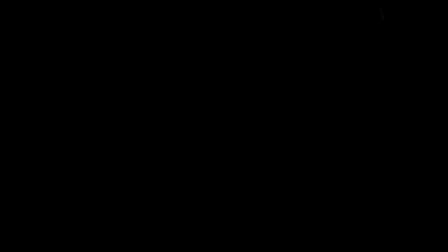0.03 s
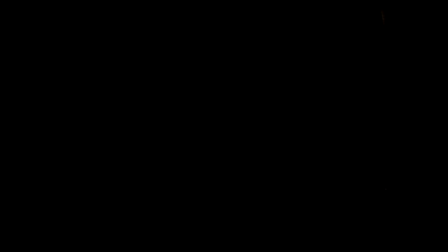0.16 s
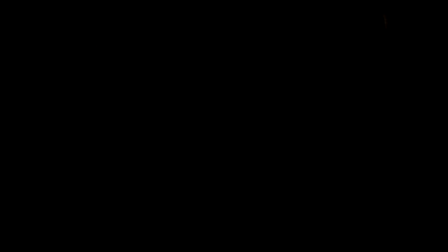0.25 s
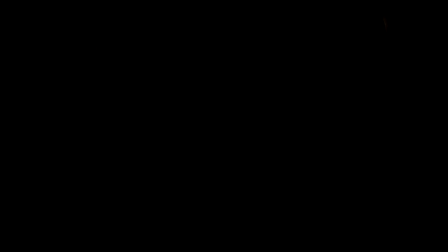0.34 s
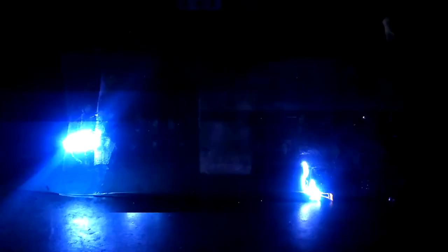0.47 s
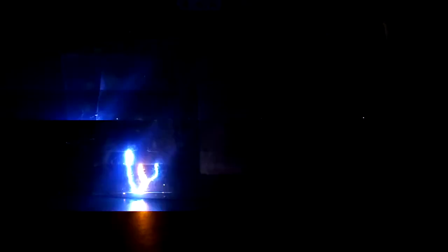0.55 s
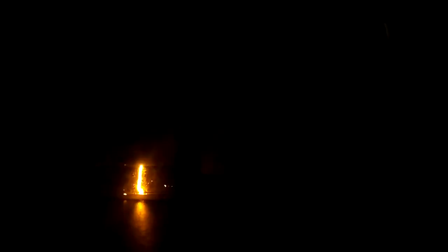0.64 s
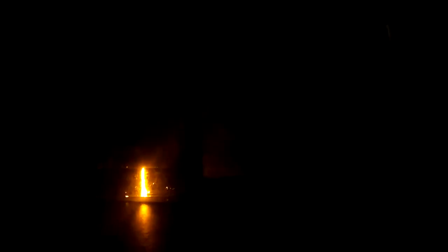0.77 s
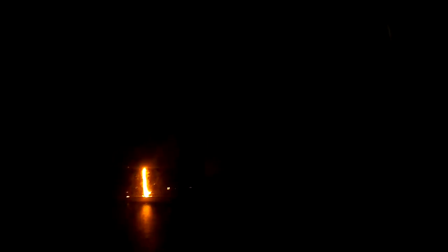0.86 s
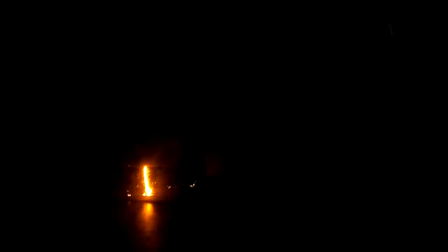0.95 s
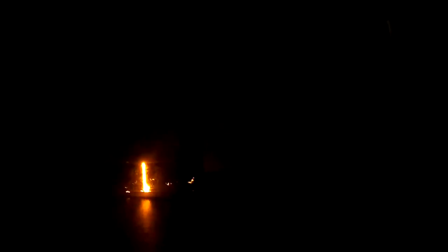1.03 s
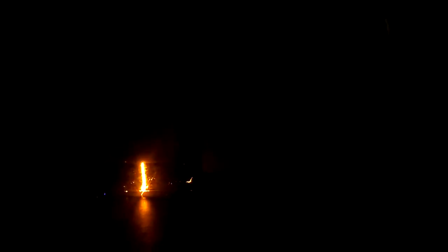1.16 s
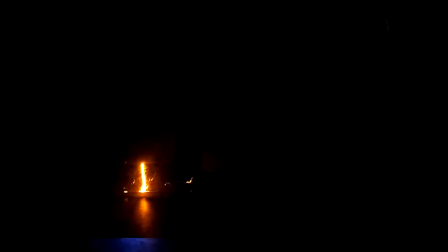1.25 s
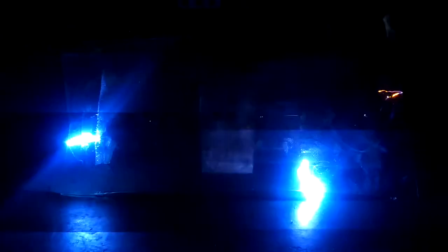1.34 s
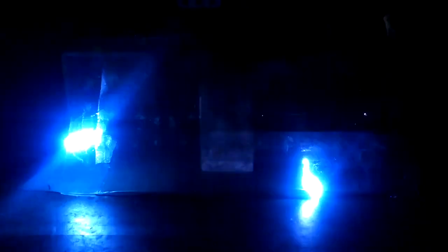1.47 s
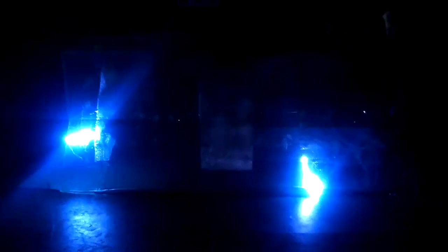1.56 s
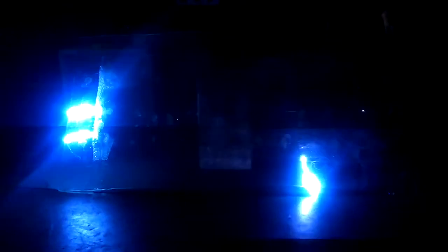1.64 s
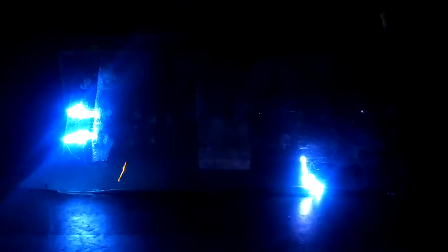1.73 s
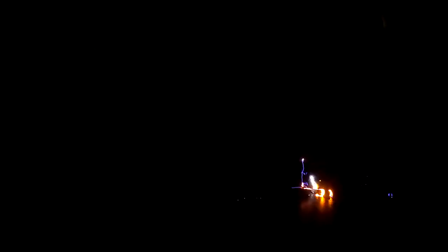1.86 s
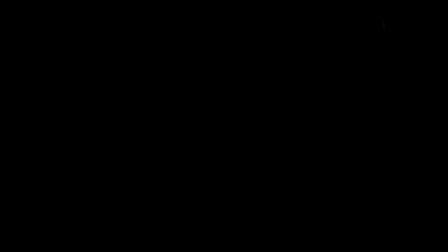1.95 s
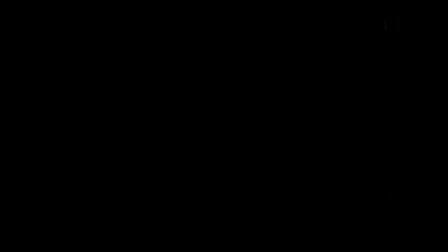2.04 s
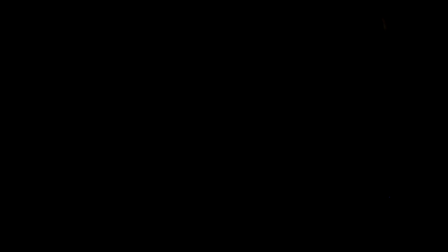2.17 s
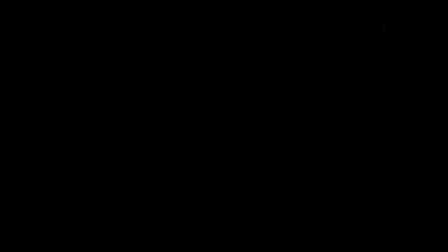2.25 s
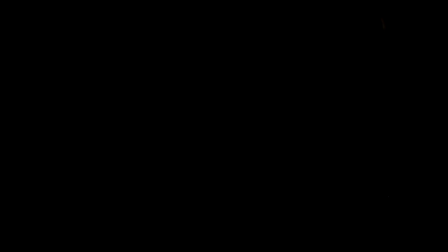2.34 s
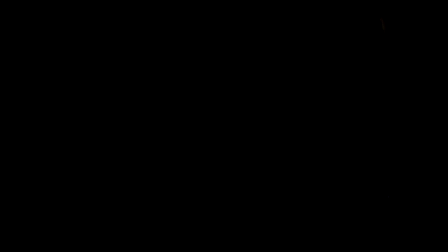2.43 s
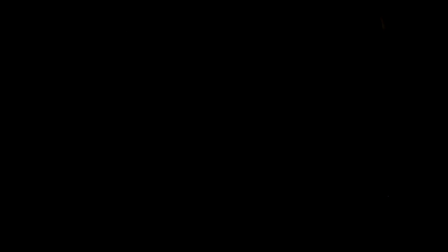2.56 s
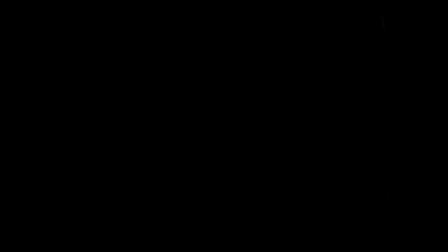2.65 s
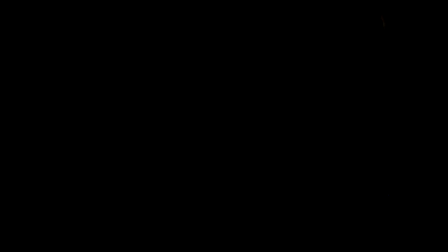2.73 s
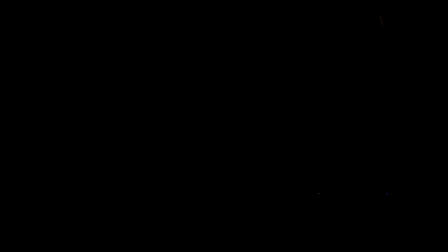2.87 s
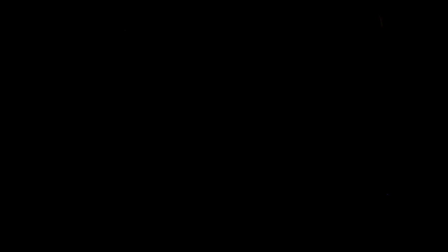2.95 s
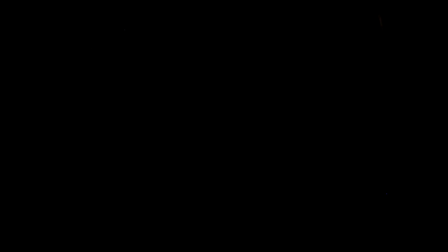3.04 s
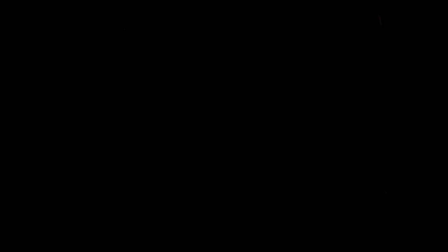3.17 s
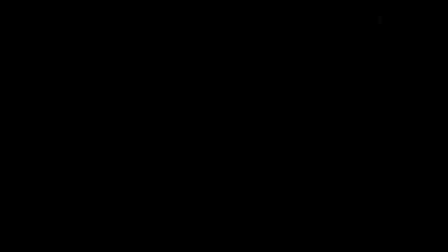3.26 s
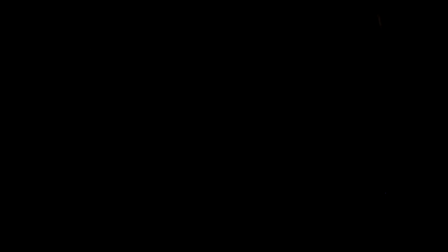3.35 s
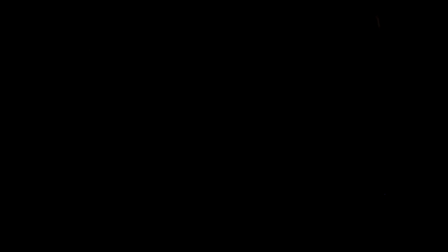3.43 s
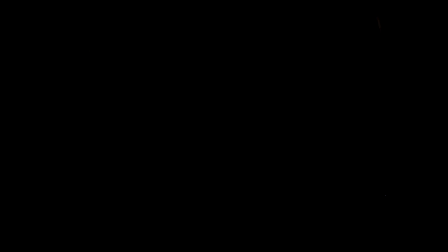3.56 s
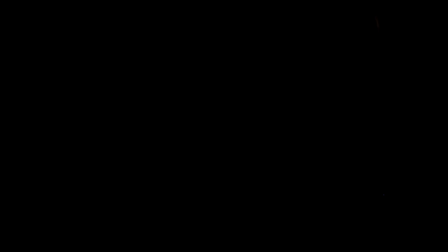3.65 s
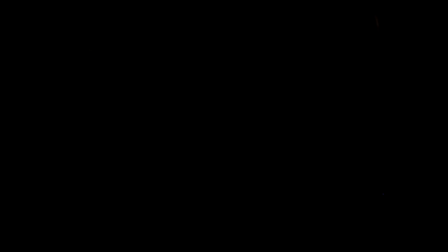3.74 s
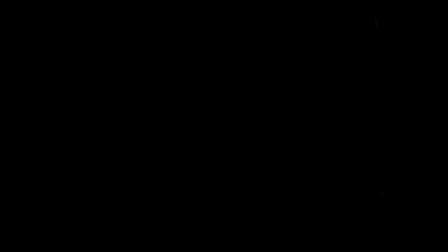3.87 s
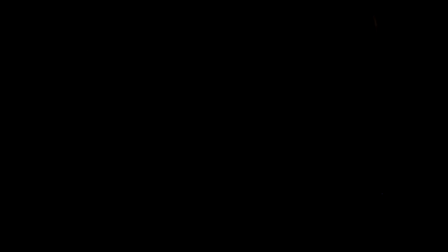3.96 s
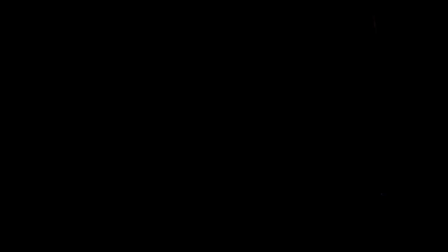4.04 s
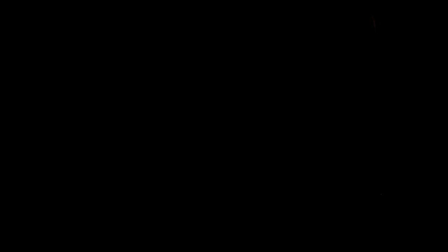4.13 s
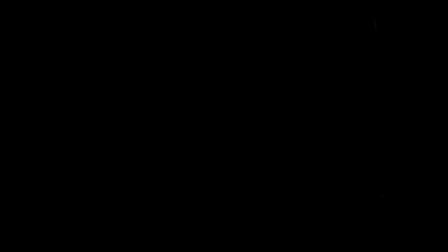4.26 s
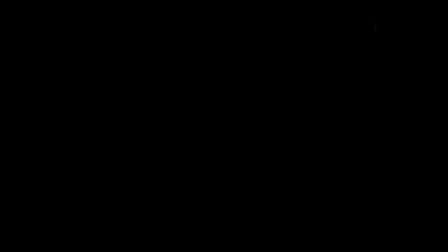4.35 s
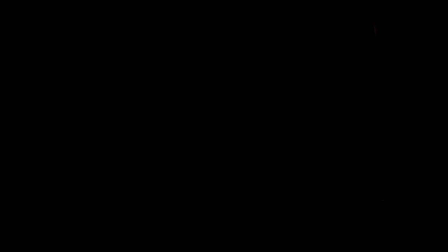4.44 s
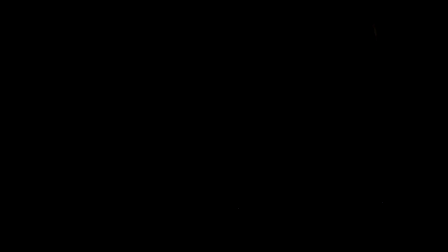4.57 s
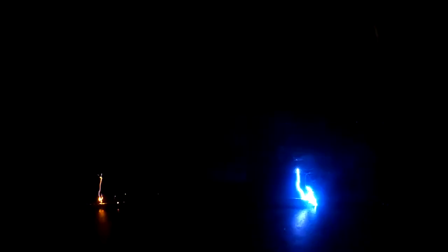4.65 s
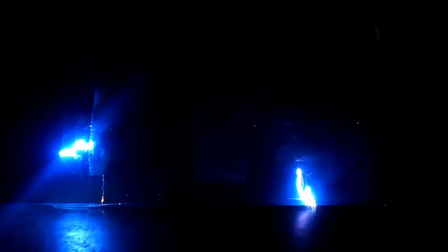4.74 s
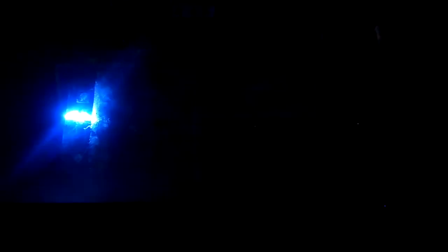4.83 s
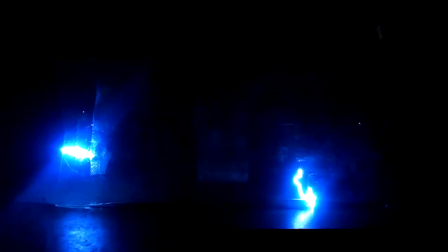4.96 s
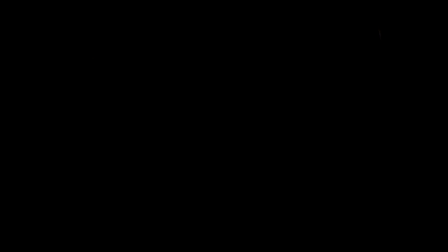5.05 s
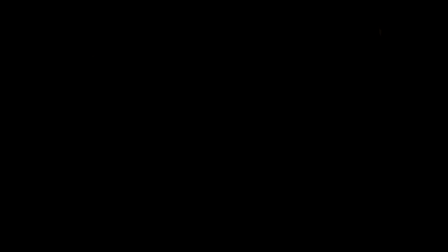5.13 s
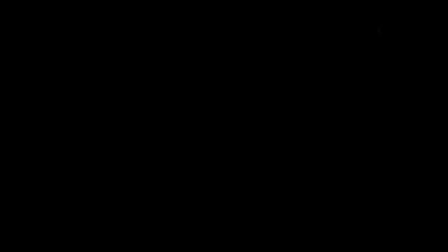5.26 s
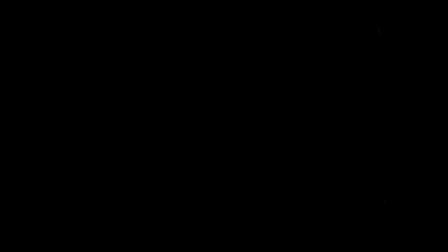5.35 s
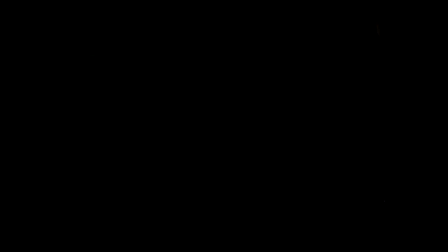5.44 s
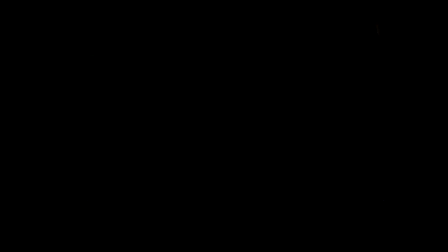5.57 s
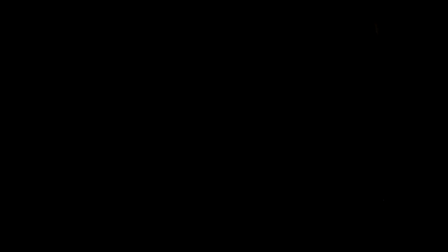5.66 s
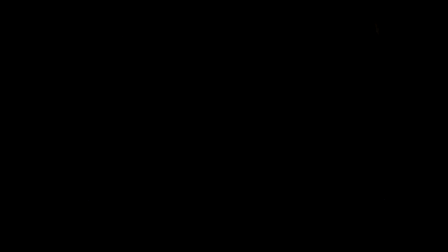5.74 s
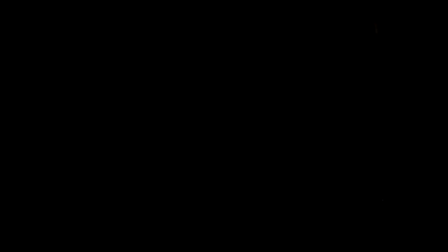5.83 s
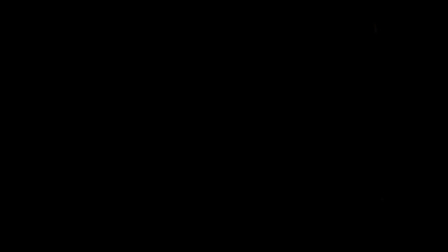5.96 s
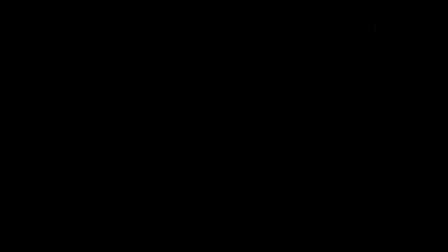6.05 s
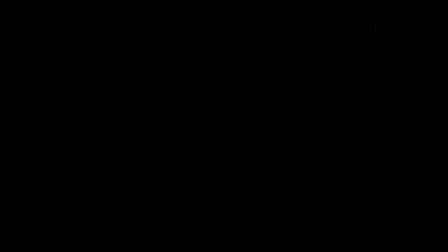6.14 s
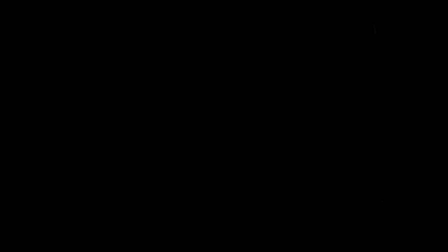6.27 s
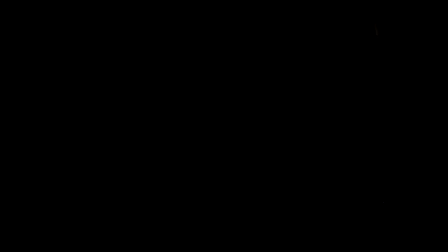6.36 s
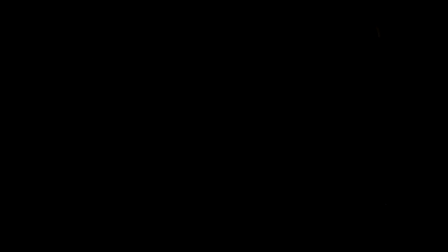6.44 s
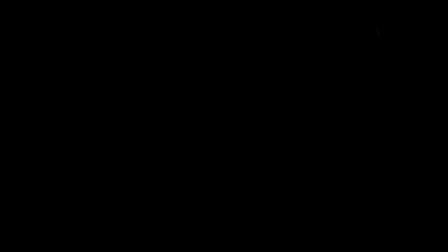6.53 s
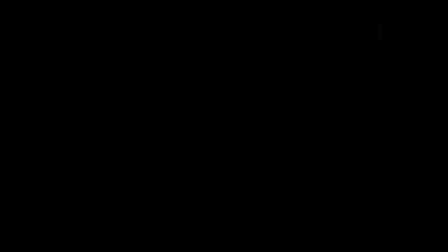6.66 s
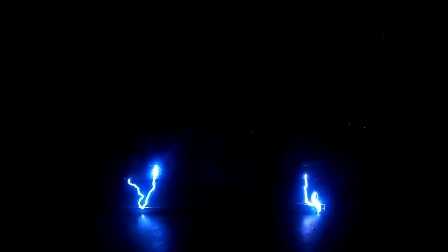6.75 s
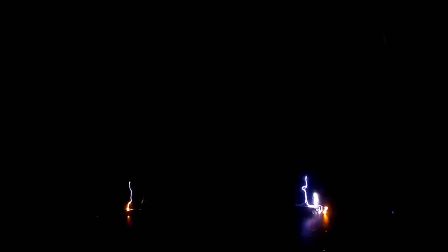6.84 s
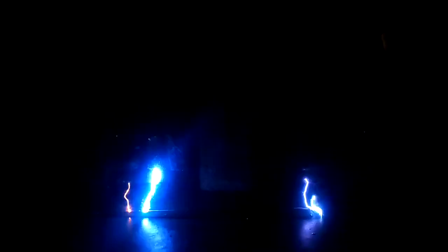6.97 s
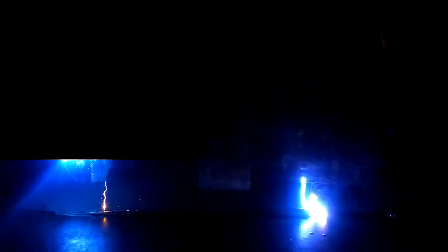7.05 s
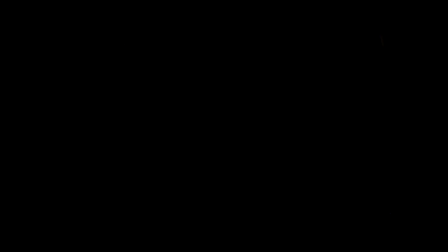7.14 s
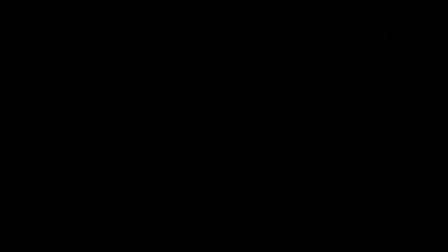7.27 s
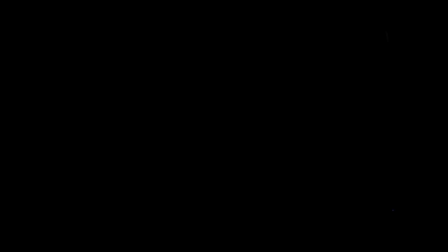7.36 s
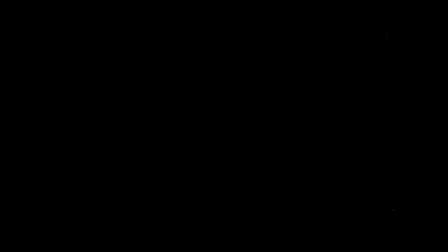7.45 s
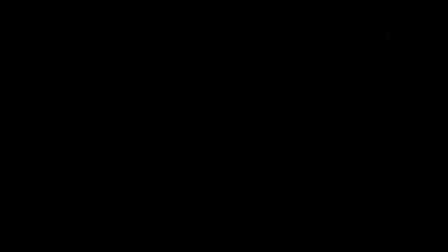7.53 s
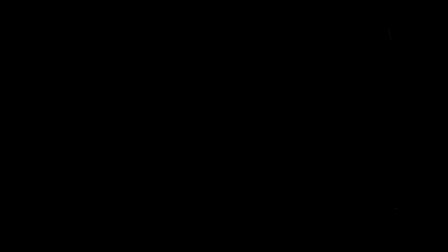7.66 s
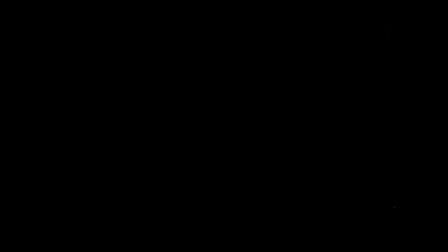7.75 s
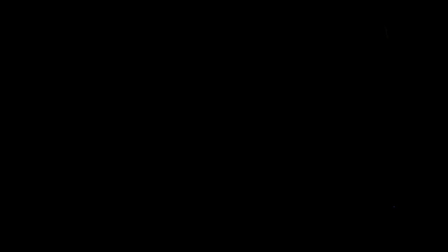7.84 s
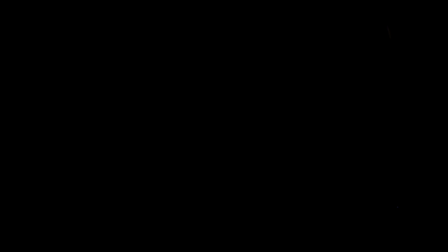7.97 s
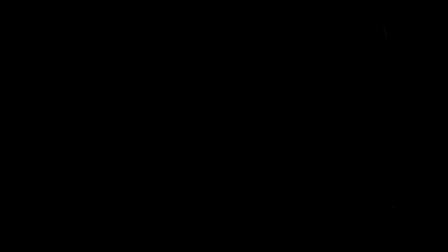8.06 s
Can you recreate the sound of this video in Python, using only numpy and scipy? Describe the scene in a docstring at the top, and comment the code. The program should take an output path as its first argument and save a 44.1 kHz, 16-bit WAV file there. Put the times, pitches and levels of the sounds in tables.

```python
"""A hard, dark room: high-voltage arcs flash over close to two microphones, over a 60 Hz transformer buzz. In a
flashover the gap breaks down every half cycle, with noise cracks, low thumps and a room roar. After the first
flashovers a flame-like arc burns steadily, a nasal buzz of relighting snaps. Behind it are mains harmonics, a
throbbing corona hiss and small dry snaps. A limiter ducks the buzz under the cracks and lets it swell back;
stereo widening spreads the pair."""
import sys
import numpy as np
from scipy import signal
from scipy.fft import rfft, irfft, next_fast_len
from scipy.io import wavfile
from scipy.ndimage import uniform_filter1d, minimum_filter1d

SR = 44100
rng = np.random.default_rng(int(sys.argv[2]) if len(sys.argv) > 2 else 0)


def unload_audio(sound):
    """Save the sound as a 16-bit wav file, at the path given as the first command line argument."""
    columns = np.transpose(np.atleast_2d(sound))
    # keep every value between -1 and 1, then stretch to whole-number steps
    steps = np.round(np.clip(columns, -1, 1) * 32767)
    wavfile.write(sys.argv[1], SR, steps.astype(np.int16))


N = 357210

# transformer lines: (multiple of the mains [1], level [dB])
HUM_LINES = [(2, -75), (4, -66.5), (6, -75.5), (8, -73), (10, -80.5), (13, -83), (14, -84.5), (16, -83.5),
             (17, -89), (18, -82.5), (19, -85.5), (20, -84), (22, -83.5), (26, -86), (28, -86), (34, -77),
             (35, -99), (36, -79), (37, -69), (38, -82), (40, -82), (43, -86), (46, -90), (50, -81.5),
             (51, -81.5), (53, -86), (54, -81.5), (55, -103), (66, -85.5), (99, -82.5)]
# level of each remaining mains harmonic in the buzz: (frequency [Hz], level [dB])
BUZZ_LEVELS = [(600, -90), (1200, -105), (1800, -82), (2300, -92), (3200, -103.5), (4000, -92.5),
               (5000, -96), (6300, -96.5), (8000, -106), (10000, -96)]
# spectrum of the corona hiss: (frequency [Hz], relative density [dB/Hz])
HISS_SPECTRUM = [(40, -31), (100, -1.5), (400, -1.5), (800, -6), (1600, 4), (2250, 6), (3200, -0.5),
                 (4500, 0), (6300, -2), (9000, -5), (14000, -5.5)]
# small snaps that fail to bridge the gap: (time [s], level [dB])
SNAP_EVENTS = [(1.3042, -32), (2.8532, -25.5), (4.5698, -38), (4.701, -46), (4.9853, -39)]
# spectrum of a small snap: (frequency [Hz], relative density [dB/Hz])
SNAP_SPECTRUM = [(250, -30), (600, -3.5), (1200, 5), (1800, 8), (2600, 0), (4500, -4.5), (9000, -9),
                 (15000, -10.5)]
# course of the burning arc: (time [s], level before its resonances [dB])
FLAME_LEVELS = [(.56, -53.5), (.7, -43), (.9, -45), (1.1, -44.5), (1.2, -44.5), (1.31, -45)]
# spectrum of the burning arc before its resonances: (frequency [Hz], relative density [dB/Hz])
FLAME_SPECTRUM = [(100, -29), (250, -20), (420, -14), (700, -12), (1200, -8.5), (1700, 2), (2400, -4),
                  (3200, -10.5), (4500, -8), (6300, -14), (9000, -17.5), (14000, -23)]
# resonances of the burning arc: (frequency [Hz], width [Hz], level [dB])
FLAME_RESONANCES = [(690, 180, -0.5), (1150, 82, 8), (2460, 170, -14)]
# flashovers: (start [s], end [s], power [dB], thump [dB])
FLASHOVER_EVENTS = [(0.418, .49, 0, -15.5), (.495, .566, -0.5, -12), (1.328, 1.682, 0, -13.5),
                    (1.726, 1.832, -0.5, -13.5), (1.835, 1.868, -9.5, -16), (1.91, 1.936, -1, -11.5),
                    (4.724, 4.893, -1.5, -14), (5.009, 5.029, -2, -10.5), (6.816, 6.847, -7, -16.5),
                    (6.876, 6.901, -0.5, -19.5), (6.956, 7.059, -11, -27.5), (7.074, 7.102, -5.5, -27)]
# single hard cracks that strike the gap or stand out of a flashover: (time [s], crack [dB], thump [dB])
LOUD_CRACKS = [(0.4115, -15, -18.5), (0.5059, -9, -15), (1.3119, -11.5, -9), (1.7294, -16, -2),
               (1.9033, -12, -21), (1.9102, -12, -3), (4.5772, -11.5, -1.5), (4.7102, -17.5, -9.5),
               (4.9933, -11, -15), (5.0113, -15.5, -8.5), (6.8089, -11.5, -14.5), (6.826, -16.5, -7.5),
               (6.8914, -17, -6), (6.9594, -17, -9), (6.9838, -18, -5.5), (7.0768, -20, -2.5),
               (7.085, -12.5, -12)]
# spectrum of the cracks: (frequency [Hz], relative density [dB/Hz])
CRACK_SPECTRUM = [(40, -23.5), (200, 6), (600, 0), (1100, -2), (1800, 3.5), (3000, -4.5), (5000, -3.5),
                  (9000, -5.5), (14000, -8.5)]
# spectrum of the roar in the room: (frequency [Hz], relative density [dB/Hz])
ROAR_SPECTRUM = [(60, -2), (200, -3), (500, -4.5), (1000, -4.5), (1700, 5.5), (2500, 0), (5000, 2),
                 (7000, -1.5), (9500, -1), (12000, -3), (15000, -4)]
# decay of the room: (frequency [Hz], time to fall 60 dB [s])
ROOM_DECAY = [(150, 0.15), (1000, 0.18), (3000, 0.24), (8000, 0.2), (15000, 0.14)]
# response of the far, left microphone: (frequency [Hz], level [dB])
FAR_MIC_RESPONSE = [(700, -1), (1100, -7), (5000, -8), (8000, -4), (14000, 0)]
# widening: (frequency [Hz], share of the other microphone taken away [1])
CROSS_SHARE = [(900, 1), (1800, .72), (3000, 1), (7300, 1), (9000, .55), (10500, 1), (11000, 1),
               (12000, .3)]
# emphasis of the difference between the channels: (frequency [Hz], level [dB])
SIDE_EMPHASIS = [(400, 2.7), (750, 4.5), (1300, -3), (2200, 0)]

MAINS_HZ, STRIKE_PHASE = 60.02, .45  # the phase is in half cycles
# one polarity of the mains breaks down harder than the other
POLARITY_CRACK_DB, POLARITY_THUMP_DB = 1, 4.5
# a cold gap holds off more voltage: the first sparks are harder until the air has warmed
COLD_CRACK_DB, COLD_THUMP_DB, WARM_S = 5, 1.5, 0.02
TIME = np.arange(N) / SR
HALF_CYCLES = 2 * MAINS_HZ * TIME - STRIKE_PHASE


def amp(db):
    """Decibels to gain."""
    return 10 ** (np.asarray(db) / 20)


def evened(x):
    """Scales to an rms of one."""
    return x / np.sqrt(np.mean(x ** 2) + 1e-20)


def read(points, hz):
    """Reads a table on a log-frequency axis."""
    f, value = np.transpose(points)
    return np.interp(np.log(hz + 1), np.log(f + 1), value)


def add(mix, s, sound):
    """Adds a sound to the mix at time s."""
    part = mix[..., round(s * SR):][..., :sound.shape[-1]]
    part += sound[..., :part.shape[-1]]


def colour(x, points):
    """Causal minimum-phase filter of unit energy with the given spectrum."""
    hz = abs(np.fft.fftfreq(2048, 1 / SR))
    log_gain = np.log(amp(read(points, hz)))
    response = np.exp(signal.hilbert(log_gain).conj())
    taps = np.fft.ifft(response).real[:1024]
    return signal.oaconvolve(x, taps[None] / np.linalg.norm(taps), axes=1)[:, :N]


def highpass(x, hz):
    """Second-order bass roll-off."""
    return signal.sosfilt(signal.butter(2, hz, "high", fs=SR, output="sos"), x)


def room(x, gap=0.0024):
    """Diffuse echo at each microphone: it builds up after a short gap, each band dying at its own rate."""
    hz, t, bands = signal.stft(rng.standard_normal((2, SR // 2)), SR, nperseg=256)
    decay = amp(-60 * t / read(ROOM_DECAY, hz)[:, None])
    tail = signal.istft(bands * decay, SR, nperseg=256)[1]
    tail *= np.clip(TIME[:tail.shape[1]] / gap - .5, 0, 1)  # silent for half the gap, then a ramp
    return signal.fftconvolve(x, tail / np.linalg.norm(tail[0]), axes=1)[:, :N]


def strikes(start, end):
    """The moments at which the voltage reaches breakdown, twice a mains cycle."""
    s = TIME[1:][np.diff(np.floor(HALF_CYCLES)) > 0]
    return s[(s >= start) & (s <= end)]


def crack(decay):
    """The ragged shock of a crooked spark channel: decaying noise with the energy of 2 ms at an rms of one."""
    t = TIME[:SR // 125]
    shock = rng.standard_normal((2, len(t))) * np.exp(-t / decay)
    return shock / np.linalg.norm(shock, axis=1, keepdims=True) * np.sqrt(SR / 500)


def transformer(scatter=0.65):
    """The core hums on multiples of the mains; its loose sheets add a thin buzz of high ones."""
    lines = {round(k): db for k, db in HUM_LINES}
    hum = np.zeros(N)
    knots = np.linspace(0, TIME[-1], 40)
    for k, db in lines.items():
        waver = np.interp(TIME, knots, amp(db + .5 * rng.standard_normal(len(knots))))
        phase = scatter * np.sqrt(k) * rng.standard_normal()
        hum += waver * np.cos(2 * np.pi * k * MAINS_HZ * TIME + phase)

    # the buzz is one mains cycle, read over and over
    orders = np.setdiff1d(np.arange(3, 170), list(lines))
    turn = np.linspace(0, 1, 4096)
    size_db = read(BUZZ_LEVELS, orders * MAINS_HZ) + 3 * rng.standard_normal(len(orders))
    phase = rng.random(len(orders))
    cycle = np.cos(2 * np.pi * (np.outer(turn, orders) + phase)) @ amp(size_db)
    buzz = np.interp(MAINS_HZ * TIME % 1, turn, cycle)
    return np.sqrt(2) * (hum + buzz)  # table levels are rms


def corona(level_db=-64, throb=0.25):
    """A fine hiss from the live conductors, swelling with each half cycle."""
    hiss = rng.standard_normal((2, N)) * (1 + throb * np.cos(2 * np.pi * HALF_CYCLES))
    return amp(level_db) * colour(hiss, HISS_SPECTRUM)


def snaps(decay=0.00052, wet_db=-11):
    """Single small discharges: thin, dry ticks with a faint echo."""
    ticks = np.zeros((2, N))
    for s, db in SNAP_EVENTS:
        add(ticks, s, amp(db) * crack(decay))
    ticks = colour(ticks, SNAP_SPECTRUM)
    return ticks + amp(wet_db) * room(ticks)


def flame(sizzle_db=-26, spread_db=2, jitter=.00008):
    """The burning arc relights with a like snap and a puff of sizzle every half cycle: a nasal buzz."""
    pulses = np.zeros((2, N))
    times, level_db = np.transpose(FLAME_LEVELS)
    for s in strikes(times[0], times[-1]):
        late, size = rng.standard_normal(2)
        snap = amp(sizzle_db) * crack(.002)
        snap[:, 0] -= 1  # the snap itself, the same every time
        snap /= np.linalg.norm(snap[1])
        snap_db = np.interp(s, times, level_db) + spread_db * size
        add(pulses, s + jitter * late, amp(snap_db) * snap)
    # the pulses' energy per half cycle is scaled to a steady level, 3 dB under unit rms
    pulses = colour(pulses, FLAME_SPECTRUM) * np.sqrt(SR / (4 * MAINS_HZ))
    rings = sum(amp(db) * signal.lfilter(*signal.iirpeak(hz, hz / width, fs=SR), pulses)
                for hz, width, db in FLAME_RESONANCES)
    pulses = pulses + rings
    return (pulses + room(pulses)) * amp(1.0)


def thump(width=0.00046, swing_hz=100, tear_db=-9, tear_hz=1500):
    """A ragged low thump jolts the near microphone and swings back through its bass roll-off."""
    u = TIME[:SR // 40] / (width * amp(3.4 * rng.standard_normal()))  # width in s, varied
    blast = u ** 2 * np.exp(-u)
    lowpass = signal.butter(2, tear_hz, fs=SR, output="sos")
    tear = evened(signal.sosfilt(lowpass, rng.standard_normal((2, len(u)))))
    shove = np.array([[0], [rng.choice([-1, 1])]])  # near, right microphone only
    push = highpass(blast * (shove + amp(tear_db) * tear), swing_hz)
    return push / abs(push).max()


def sparks(crack_db=-20, crack_spread_db=4.5, thump_spread_db=6, roar_spread_db=3.0, crack_follow=0.68,
           decay=0.0016, loud_decay=0.0012, jitter=.0006, room_db=-17, loud_room_db=-11):
    """Every breakdown gives a crack and a thump, and fills the room with a bright roar."""
    cracks, thumps, send = np.zeros((3, 2, N))
    loud_times = np.array(LOUD_CRACKS)[:, 0]
    for s, peak_db, blast_db in LOUD_CRACKS:
        shock = amp(peak_db) * crack(loud_decay)
        add(cracks, s, shock)
        add(send, s, amp(loud_room_db) * shock)
        add(thumps, s, amp(blast_db) * thump())

    for start, end, power_db, thump_db in FLASHOVER_EVENTS:
        for s in strikes(start, end):
            late, size, blast = rng.uniform(-1, 1, 3)
            hard = round(HALF_CYCLES[round(s * SR)]) % 2
            cold = np.exp(-(s - start) / WARM_S)
            peak_db = crack_db + crack_follow * power_db + crack_spread_db * size
            peak_db += POLARITY_CRACK_DB * hard + COLD_CRACK_DB * cold
            blast_db = thump_db + thump_spread_db * blast
            blast_db += POLARITY_THUMP_DB * hard + COLD_THUMP_DB * cold
            shock, push = crack(decay), thump()
            add(send, s, amp(power_db + room_db + roar_spread_db * size) * shock)
            # a loud crack close by takes the place of this spark
            if abs(loud_times - s).min() > 1 / (4 * MAINS_HZ):
                add(cracks, s + jitter * late, amp(peak_db) * shock)
                add(thumps, s + jitter * late, amp(blast_db) * push)
    return colour(cracks, CRACK_SPECTRUM) + thumps + colour(room(send), ROAR_SPECTRUM)


def scene():
    """The sound at the two microphones."""
    return transformer() + corona() + snaps() + flame() + sparks()


def limiter(x, ceiling_db=-23, recovery_db=11.0, start_db=3.5, most_db=23):
    """Gain drops at once on a crack, no lower than unity, and creeps back at so many dB a second."""
    treble = highpass(x, 900)
    power = uniform_filter1d((treble ** 2).mean(0), size=88)
    power_db = 10 * np.log10(abs(power) + 1e-12)
    wanted_db = minimum_filter1d(np.clip(ceiling_db - power_db, 0, most_db), size=45)
    rise_db = recovery_db * TIME
    gain_db = np.minimum(np.minimum.accumulate(wanted_db - rise_db), start_db) + rise_db
    return x * amp(uniform_filter1d(gain_db, size=30))


def record(dry, spacing_s=1 / 1800, edge_hz=15650):
    """Limiter; widening takes from each microphone the other one, delayed by their spacing; band limit."""
    size = next_fast_len(N + 2048)
    hz = np.fft.rfftfreq(size, 1 / SR)
    mics = rfft(limiter(dry), size)
    mics = mics * np.array([amp(read(FAR_MIC_RESPONSE, hz)), np.ones(len(hz))])
    delay = np.exp(-2j * np.pi * hz * spacing_s)
    left, right = mics - read(CROSS_SHARE, hz) * mics[::-1] * delay
    mid = (left + right) / 2
    side = amp(read(SIDE_EMPHASIS, hz)) * (left - right) / 2
    wide = irfft(np.array([mid + side, mid - side]), size)[:, :N]
    band = signal.firwin(301, edge_hz, window=("kaiser", 9), fs=SR)
    return signal.oaconvolve(np.tanh(wide), band[None], "same")  # soft clipping, then the band limit


dry = scene()
out = record(dry)
unload_audio(out)
```